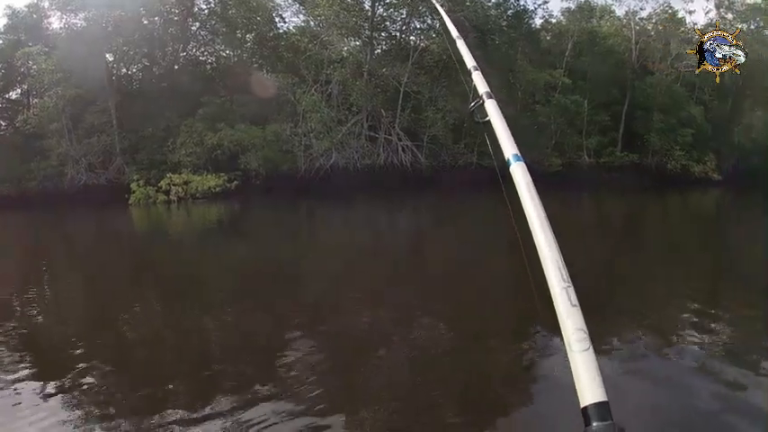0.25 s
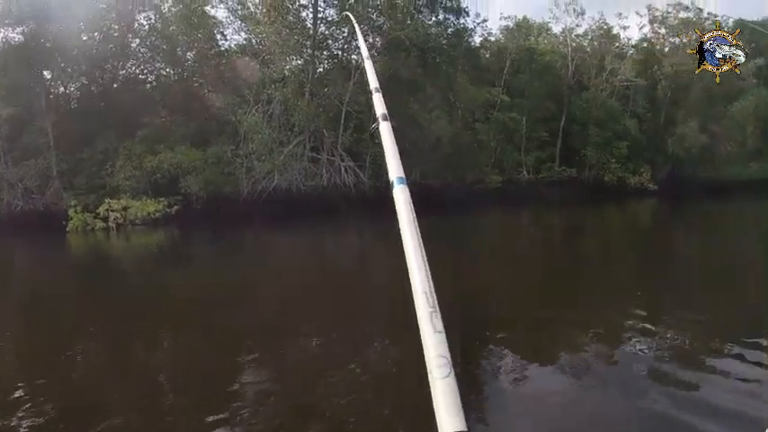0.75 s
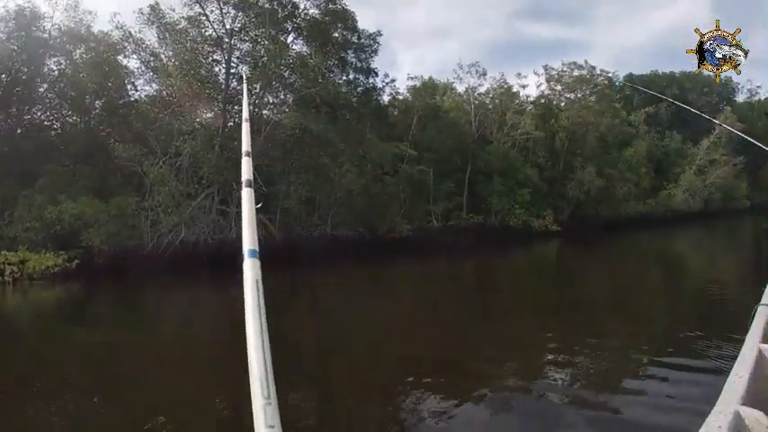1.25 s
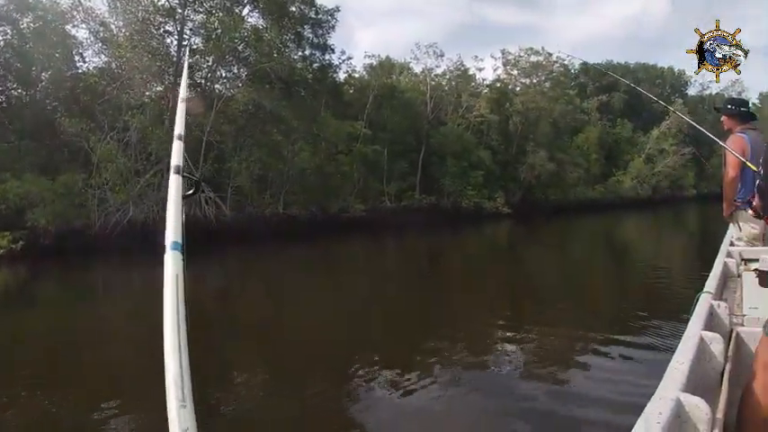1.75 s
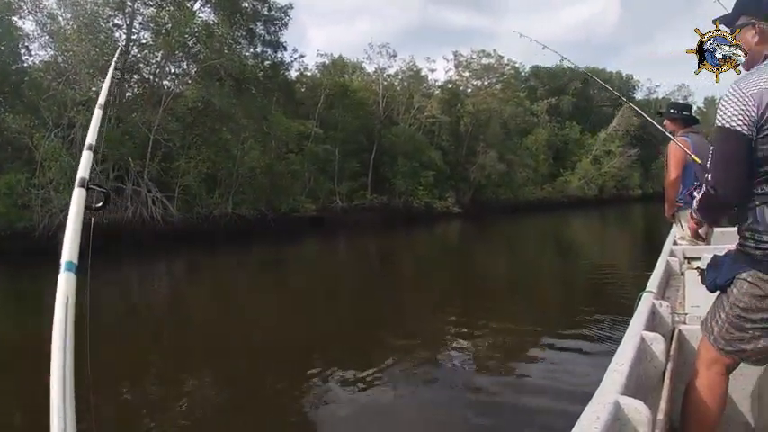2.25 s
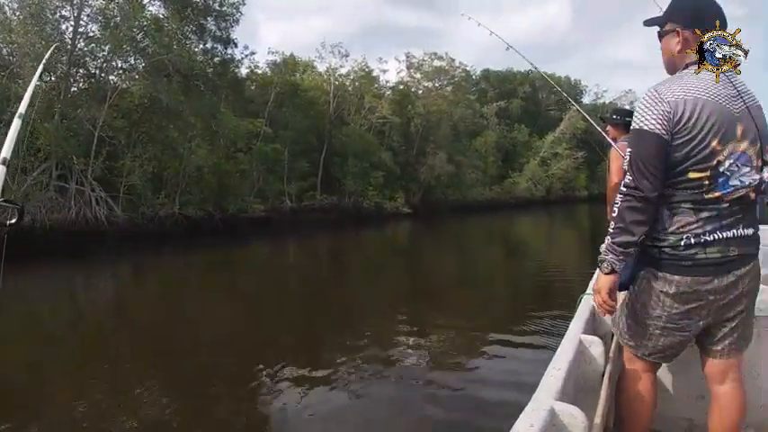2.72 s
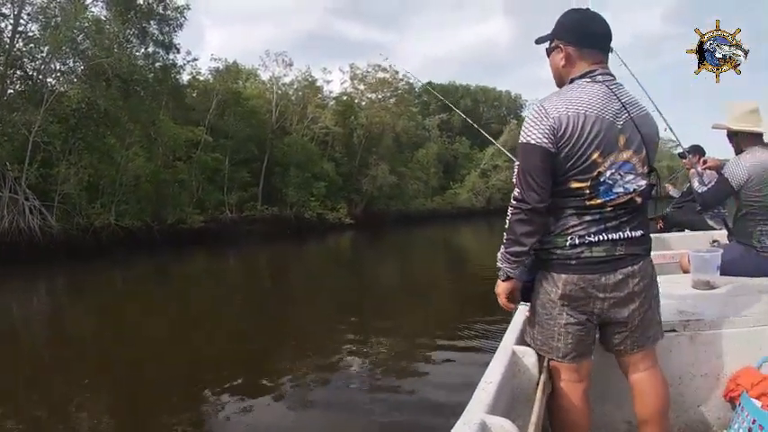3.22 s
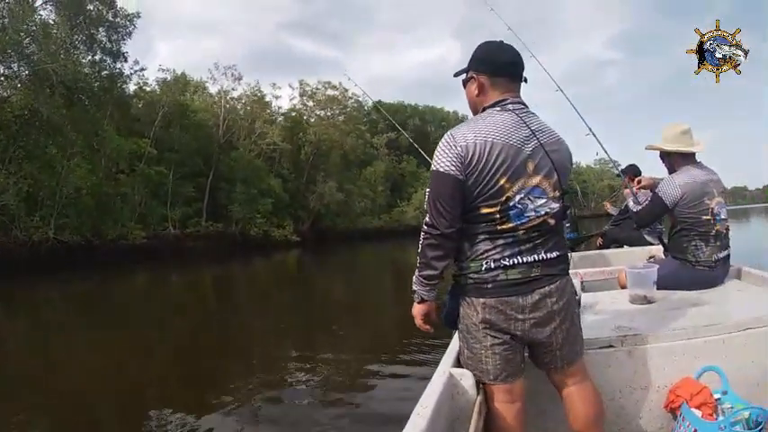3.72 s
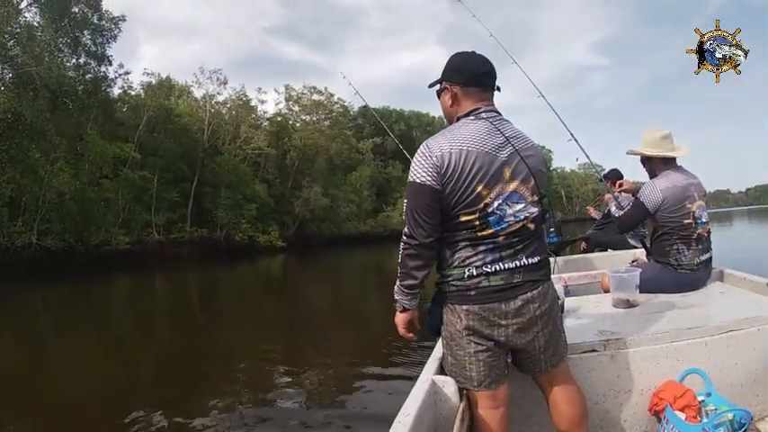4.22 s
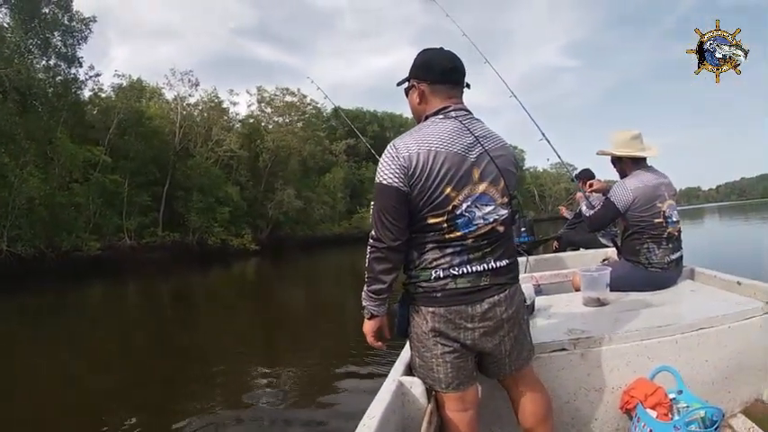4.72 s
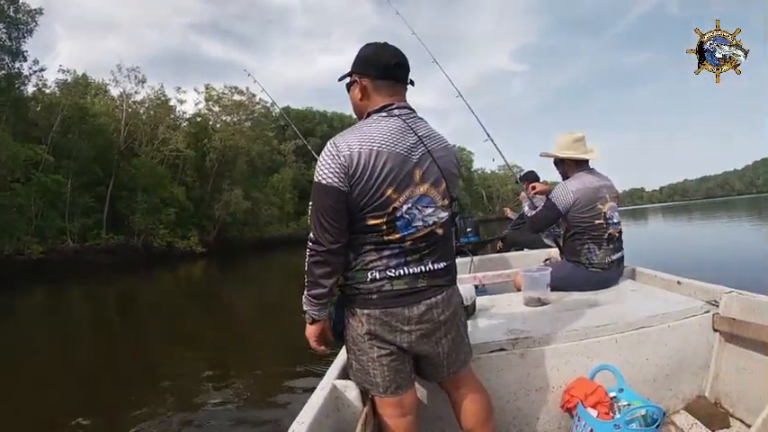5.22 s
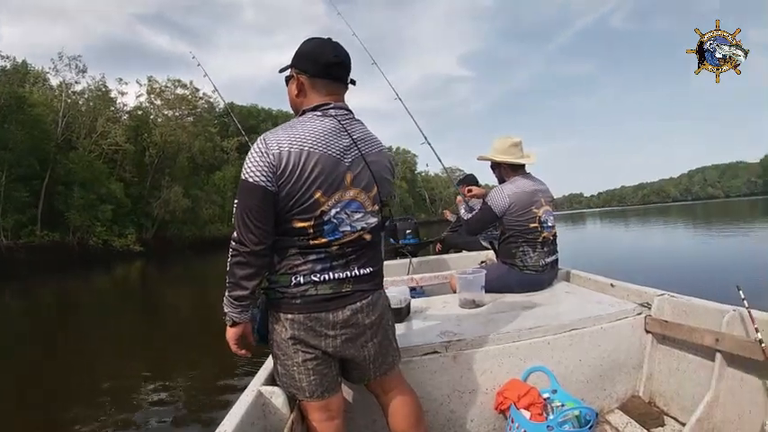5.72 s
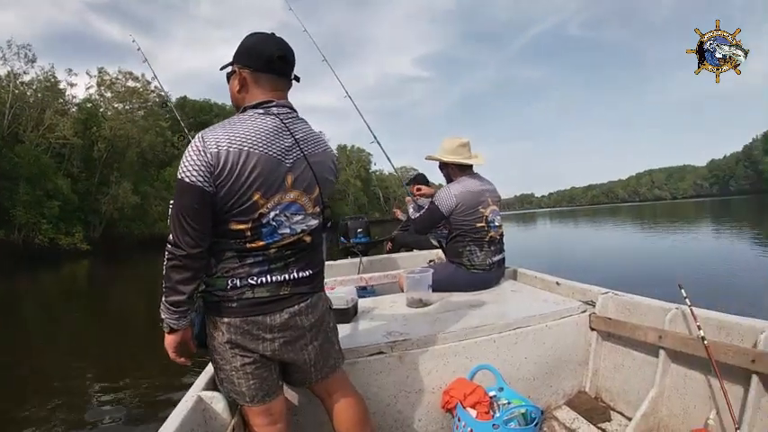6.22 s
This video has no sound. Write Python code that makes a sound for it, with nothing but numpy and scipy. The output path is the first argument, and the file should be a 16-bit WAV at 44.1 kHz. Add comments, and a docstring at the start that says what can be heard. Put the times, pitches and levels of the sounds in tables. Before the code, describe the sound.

A quiet outdoor background runs throughout: a soft breeze, a thin high hiss of insects and a faint low boom of ripples against a small boat's hull. From the start a nearby fishing reel is wound with a light rubbing sound. It clicks at about 0.5 seconds, something creaks at 0.7, and the bail snaps shut in a sharp cluster of clicks at 0.8, the loudest moment. The winding fades out by 2 seconds. From about 1.2 seconds, soles scrape, clothes rustle and gear ticks, busiest between 2.4 and 3.6. Soft, hollow foot knocks sound on the hull, strongest near 2.7, 3.5 and 3.9, with a rattling run from 5.1 to 5.5. Between 4.6 and 5.9 a distant bird whistles several high, mostly falling notes that echo in the trees. A few light knocks and rustles continue to the end, at about 6.5 seconds.

```python
"""Fishing boat on a calm creek

A reel is wound and its bail snaps shut. Feet scuff and knock on the small open hull, clothes rustle,
gear ticks and creaks. Ripples keep the hull booming. Insects hiss on the wooded bank and a far bird
whistles mostly falling notes into the echo of the trees."""
import sys
import numpy as np
from scipy import signal
from scipy.fft import rfft, irfft, next_fast_len
from scipy.io import wavfile
from scipy.ndimage import map_coordinates

SR = 44100
rng = np.random.default_rng(int(sys.argv[2]) if len(sys.argv) > 2 else 0)


def generate_wav(signal):
    """Clip the signal to [-1, 1] and save it as 16-bit WAV at the path in sys.argv[1]."""
    frames = np.transpose(np.atleast_2d(signal))
    scaled = np.clip(frames, -1, 1) * 32767
    pcm = np.round(scaled).astype(np.int16)
    wavfile.write(sys.argv[1], SR, pcm)


N = 285327


def amp(db):
    return 10 ** (np.asarray(db) / 20)


def unit_rms(x):
    return x / np.sqrt(np.mean(x ** 2) + 1e-20)


def curve(points):
    """(time_s, value) points interpolated per sample."""
    return np.interp(np.arange(N) / SR, *np.transpose(points))


def wobble(rate_hz):
    """Smooth random curve, rate_hz knots a second."""
    knots = rng.standard_normal(int(N * rate_hz / SR) + 4)
    return map_coordinates(knots, [np.arange(N) * rate_hz / SR])


def filtered(x, response):
    """x through a complex frequency response."""
    size = next_fast_len(len(x) + SR // 4)
    return irfft(rfft(x, size) * response(np.fft.rfftfreq(size, 1 / SR)), size)[:len(x)]


def coloured(x, spectrum):
    """x through (freq_hz, gain_db) points on a log axis, rms 1."""
    hz, db = np.transpose(spectrum)
    return unit_rms(filtered(x, lambda f: amp(np.interp(np.log(f + 1), np.log(hz + 1), db))))


def modes(peaks):
    """Causal response of (freq_hz, width_hz, gain_db) resonances."""
    return lambda f: sum((-1) ** k * amp(db) * 1j * f * width / (hz * hz - f * f + 1j * f * width)
                         for k, (hz, width, db) in enumerate(peaks))


def band_noise(samples, centre_hz, width_hz, stages=1):
    """Noise through identical resonators in series, rms 1."""
    band = modes([(centre_hz, width_hz, 0)])
    return unit_rms(filtered(rng.standard_normal(samples), lambda f: band(f) ** stages))


def gritty(grit_db, rate_hz):
    """Noise with a randomly jumping level, rms 1."""
    return unit_rms(rng.standard_normal(N) * amp(grit_db * wobble(rate_hz)))


def soft_top(hz):
    """Low-pass: contacts on the gear carry little of the top octave."""
    return 1 / (1 + 1.2j * hz / 8500 - (hz / 8500) ** 2) ** 3


def add(track, start_s, sound):
    part = track[round(start_s * SR):][:len(sound)]
    part += sound[:len(part)]


# Hull boom spectrum: freq_hz, gain_db
BOOM_SPECTRUM = [(8.8, -34.5), (15, -3.5), (54, -0.5), (86, -10.5), (110, -2.5), (140, -39), (240, -120)]
# Hull panel spectrum: freq_hz, gain_db
PANEL_SPECTRUM = [(80, -30), (110, -14.5), (150, 4.5), (190, -3), (230, -6), (290, -11.5), (450, -23),
                  (900, -59)]
# Panel murmur: time_s, level_db
MURMUR_LEVEL = [(0, -64), (.8, -60.5), (1.75, -65), (2.5, -56.5), (3.1, -60.5), (3.6, -62.5), (4.2, -61.5),
                (4.55, -55.5), (5, -61.5), (5.9, -66), (6.25, -60), (6.47, -61)]


def hull():
    """Ripples keep the hull booming; its panels murmur as people shift their weight."""
    boom = amp(-63.5) * coloured(gritty(grit_db=3, rate_hz=7.1), BOOM_SPECTRUM)
    murmur = amp(curve(MURMUR_LEVEL)) * coloured(gritty(grit_db=2.05, rate_hz=23), PANEL_SPECTRUM)
    return boom + murmur


# Open-air hiss spectrum: freq_hz, gain_db
AIR_SPECTRUM = [(150, -47), (250, -3.5), (365, -16.5), (482, -10.5), (808, -5.5), (1100, -15.5),
                (1480, -9.5), (1700, -12.5), (2120, -12), (3880, -14), (5390, -9.5), (5980, -12.5),
                (6750, -10.5), (10900, -36.5), (15400, -63)]
# Breeze swells: time_s, level_db
BREEZE_LEVEL = [(0, -62.5), (1.4, -69.5), (2.25, -66), (2.7, -64), (3.4, -66), (3.97, -68), (4.23, -64),
                (4.9, -65.5), (5.38, -66.5), (5.68, -68.5), (6.03, -64.5), (6.47, -70)]


def breeze():
    """The open air's hiss swells and sinks with the breeze."""
    level_db = curve(BREEZE_LEVEL) + 1.17 * wobble(rate_hz=1.835)
    return amp(level_db) * coloured(rng.standard_normal(N), AIR_SPECTRUM)


# Insect choruses: centre_hz, width_hz, level_db
INSECT_BANDS = [(5305, 930, -67), (6530, 870, -74)]
# Swell shared by the choruses: time_s, gain_db
INSECT_SWELL = [(0, -1), (1.5, 0.5), (3.5, 0), (4.2, -0.5), (5.2, -1.5), (5.8, -0.5), (6.47, 0)]


def insects():
    """Choruses hiss in narrow bands, each drifting a little in level."""
    out = np.zeros(N)
    for centre_hz, width_hz, level_db in INSECT_BANDS:
        drift_db = curve(INSECT_SWELL) + 2 * wobble(rate_hz=3.05)
        out += amp(level_db + drift_db) * band_noise(N, centre_hz, width_hz, stages=2)
    return out


# Reel body resonances: freq_hz, width_hz, gain_db
REEL_MODES = [(255, 83, -15), (495, 135, -11), (870, 150, -5.5), (1250, 86, 1.5), (1363, 276, -1.5),
              (1674, 230, -2), (2560, 150, -13.5), (3225, 156, -9), (3810, 257, -5), (5030, 550, -25),
              (6800, 800, -18)]
# Winding and handling: time_s, level_db
WINDING_LEVEL = [(0, -55), (.1, -56), (.15, -60), (.38, -56.5), (.5, -52.5), (.64, -61), (.7, -48.5),
                 (.74, -56.5), (.8, -51.5), (.89, -60.5), (.93, -52), (1.02, -61), (1.3, -64), (1.36, -76),
                 (1.62, -74), (1.68, -60.5), (1.82, -56.5), (2.06, -65.5), (2.2, -100)]
# Snaps on the reel: start_s, ring_db, upper_modes_db, crack_db, damping_factor, seat_after_s
REEL_SNAPS = [(0.448, -41, -14, -57, 1.6, .05), (0.485, -47, -3, -54, 0.46, .05),
              (0.76, -60, 15, -49, 1.5, .05), (0.7668, -32, -7, -38, 1.4, 0.0112),
              (.786, -30.5, 7.5, -32, 2.7, .05), (0.8238, -29, 8.5, -16.5, 1.4, 0.0025),
              (0.827, -41, 0, -38, 0.75, 0.0051), (0.8329, -25.5, -8, -29, 0.37, 0.0038),
              (0.8364, -21, 3.5, -15, 0.95, 0.00726), (0.837, -23.5, -13, -40, 0.7, 0.0044),
              (0.8452, -29.5, -9, -50, 0.97, 0.01), (1.643, -53.5, 11, -53, 1.3, .05),
              (1.738, -48.5, 6.5, -52, 1, .05)]


def reel():
    """Gears and line rub the reel's body; each snap cracks and rings the same modes."""
    out = amp(curve(WINDING_LEVEL)) * unit_rms(filtered(gritty(grit_db=3, rate_hz=150), modes(REEL_MODES)))
    t = np.arange(SR // 8) / SR
    attack = 1 - np.exp(-t / 0.00063)
    crack_response = modes([(4030, 2500, 1), (7800, 3400, -9)])
    for start_s, ring_db, upper_modes_db, crack_db, damping_factor, seat_after_s in REEL_SNAPS:
        ring = np.zeros(len(t))
        for hz, width_hz, gain_db in REEL_MODES:
            mode_db = ring_db + gain_db + upper_modes_db * (hz > 2000) + rng.normal(0, 1.45)
            decay = np.exp(-1.6 * width_hz * damping_factor * t)
            ring += amp(mode_db) * decay * np.sin(2 * np.pi * hz * t)
        choke = amp(-14 * np.clip((t - seat_after_s) / 0.00072, 0, 1))  # the part seats
        crack = amp(crack_db - 60 * t / 0.0066) * rng.standard_normal(len(t))
        add(out, start_s, ring * choke * attack + filtered(crack, crack_response))
    return filtered(out, soft_top)


def crinkles(rate_hz, size_db):
    """Gain that jumps at random creases and settles within milliseconds."""
    creases = (rng.random(N) < rate_hz / SR) * amp(size_db * np.minimum(rng.exponential(size=N), 2))
    return 1 + signal.lfilter([1], [1, -np.exp(-1 / (0.0021 * SR))], creases)


# Sole scrape spectrum: freq_hz, gain_db
SOLE_SPECTRUM = [(300, -47), (700, -16.5), (1100, -8.5), (1520, -3.5), (1720, -5.5), (1950, -3),
                 (2500, -7.5), (3200, -7.5), (4500, -28), (8000, -59.5)]
# Heavy cloth spectrum: freq_hz, gain_db
HEAVY_CLOTH_SPECTRUM = [(1200, -36), (2500, -4.5), (3500, -2.5), (5000, -2), (6500, -7), (9000, -27),
                        (14000, -75)]
# Thin cloth spectrum: freq_hz, gain_db
THIN_CLOTH_SPECTRUM = [(3500, -19.5), (5500, -4.5), (7800, 0), (9000, -8), (11500, -28.5), (15400, -42)]
# Scuffs and rustles: peak_s, hold_s, rise_s, fall_s, sole_db, heavy_cloth_db, thin_cloth_db
STROKES = [(.098, .002, 0.091, 0.081, -54, -57, -58.5), (0.163, 0.26, 0.039, .03, -76, -62, -70),
           (0.456, .002, .03, 0.014, -62, -53, -72), (0.486, 0.07, .01, .08, -63, -53.5, -67.5),
           (0.616, 0.032, 0.018, .02, -60, -62, -80), (0.711, .002, 0.064, .03, -47, -54, -72),
           (0.765, .002, 0.033, .03, -65, -49.5, -66), (0.919, .002, 0.17, 0.035, -61, -52, -62.5),
           (0.948, .2, .03, .05, -66, -63, -65.5), (1.207, 0.032, 0.059, 0.014, -52.5, -61, -73),
           (1.26, .002, .02, 0.058, -59, -66, -79), (1.365, .002, 0.09, 0.16, -65.5, -63.5, -67.5),
           (1.548, 0.0018, 0.14, 0.074, -58.5, -73, -68), (1.656, 0.37, 0.053, 0.066, -58, -58.5, -73),
           (2.048, .002, 0.18, .02, -89, -81, -63), (2.185, .002, 0.029, 0.15, -63.5, -60, -63.5),
           (2.346, 0.0017, 0.06, 0.071, -65, -67, -67.5), (2.428, 0.14, 0.051, 0.07, -49, -48, -59.5),
           (2.468, .002, 0.0069, .012, -61, -44.5, -67), (2.555, .002, 0.11, 0.053, -58, -51, -52),
           (2.651, .002, 0.027, 0.044, -61, -63, -59), (2.889, 0.052, 0.043, 0.093, -42.5, -64, -60.5),
           (2.8, 0.063, 0.054, 0.027, -56, -63, -66), (2.91, 0.063, 0.15, 0.024, -51.5, -52, -68),
           (2.993, 0.0018, 0.018, 0.025, -46, -45.5, -61), (3.052, .002, 0.041, .04, -75, -64, -68),
           (3.162, .002, 0.017, 0.047, -52.5, -55, -58.5), (3.225, .002, 0.013, 0.037, -50, -56, -64),
           (3.262, 0.083, .02, 0.13, -61, -63, -72.5), (3.46, 0.0089, 0.013, 0.013, -47.5, -51.5, -56),
           (3.579, .002, 0.083, 0.045, -54.5, -52.5, -54), (3.632, 0.067, 0.038, 0.081, -73, -64, -56),
           (3.819, .002, 0.068, 0.22, -51, -56, -66), (4.017, 0.034, 0.034, .03, -54.5, -55, -61.5),
           (4.156, .002, 0.055, 0.06, -58.5, -72, -66.5), (4.308, 0.13, 0.027, .05, -58, -56.5, -63.5),
           (4.441, 0.043, 0.044, .02, -45, -49, -62.5), (4.495, .09, .02, 0.22, -67, -57.5, -71),
           (4.59, .002, 0.081, 0.056, -74, -75, -54.5), (4.73, 0.089, .03, .03, -64.5, -74, -78),
           (5.167, .002, 0.043, 0.051, -47, -66, -75), (5.243, 0.078, .02, 0.032, -61.5, -68, -73),
           (5.434, .002, .01, 0.074, -53, -51, -67), (5.522, 0.0022, 0.021, 0.069, -54, -64, -85),
           (5.798, .002, .06, .15, -65, -70, -82), (5.913, .002, 0.0072, 0.022, -66, -44.5, -65),
           (6.109, .002, .05, .04, -65, -64, -81), (6.278, .002, .06, 0.13, -74, -63.5, -83)]


def scuffs_and_rustles():
    """Soles scrape in grit, cloth whispers and crinkles; each stroke swells, holds and fades."""
    gains, t = np.zeros((3, N)), np.arange(N) / SR
    for peak_s, hold_s, rise_s, fall_s, *levels_db in STROKES:
        first = max(round((peak_s - 3 * rise_s) * SR), 0)
        span = slice(first, round((peak_s + hold_s + 3 * fall_s) * SR))
        since_peak_s = t[span] - peak_s
        drop_db = 20 * np.maximum(-since_peak_s / rise_s, np.maximum(since_peak_s - hold_s, 0) / fall_s)
        gains[:, span] += amp(np.array(levels_db)[:, None] - drop_db)
    sole_gain, heavy_gain, thin_gain = gains
    # Both cloths catch and slip together.
    catch = amp(1.95 * wobble(rate_hz=120)) * crinkles(rate_hz=40, size_db=4)
    grit = crinkles(rate_hz=60, size_db=-5) * gritty(grit_db=2.5, rate_hz=280)
    sole = sole_gain * coloured(grit, SOLE_SPECTRUM)
    heavy = heavy_gain * coloured(catch * rng.standard_normal(N), HEAVY_CLOTH_SPECTRUM)
    thin = thin_gain * coloured(catch * rng.standard_normal(N), THIN_CLOTH_SPECTRUM)
    return amp(-4) * sole + amp(-3) * heavy + amp(1.5) * thin


# Foot knocks on the hull: start_s, deck_db, deck_hz, keel_db, locker_db, box_db, rattle_db
KNOCKS = [(.334, -52, 158.6, -78, -62, -69, -54), (.838, -46.5, 264, -70, -47, -50, -53),
          (1.208, -52.5, 227, -61, -80, -72, -62), (1.546, -43, 106, -59, -54.5, -62, -64),
          (1.569, -46, 110, -64, -76, -69, -56), (1.599, -50.5, 201, -71, -74, -76, -63),
          (1.987, -51, 282, -71, -35.5, -65, -60), (2.029, -50.5, 169, -65, -68, -61, -59),
          (2.139, -51.5, 213, -62, -57, -63, -54.5), (2.187, -46.5, 204, -56, -57, -61, -52),
          (2.693, -40, 224, -43, -66, -69, -55), (2.719, -52, 102, -49, -62, -70, -70),
          (2.744, -43, 215.5, -65, -54, -58, -55), (2.98, -51, 189, -68, -58, -45, -55),
          (2.998, -49, 180.5, -60, -62, -69, -46.5), (3.497, -32.5, 250.5, -51.5, -48, -40, -35.5),
          (3.539, -45.5, 261, -52, -56, -65, -64), (3.857, -33.5, 194.7, -48, -46.5, -81, -49.5),
          (3.899, -42, 183, -59, -83, -60, -66), (4.259, -50, 193, -75, -78, -78, -67),
          (4.499, -65, 177, -73, -65, -59, -53), (4.52, -55, 238, -69, -58, -64, -58),
          (4.538, -52, 221, -71, -49, -57, -51), (4.578, -55, 262, -75, -53.5, -62, -52),
          (4.601, -56, 226, -72, -58, -58, -57), (4.652, -64, 160, -73, -53, -57, -52),
          (4.689, -51.5, 260, -64, -56, -66, -68), (4.779, -58, 167, -53.5, -64, -52.5, -65),
          (4.852, -45.5, 195, -65, -72, -68, -64), (4.968, -47.5, 152, -50, -88, -65, -67),
          (5.121, -46.5, 300, -59, -45, -50, -53.5), (5.164, -50, 239, -65, -44, -40.5, -50),
          (5.194, -51, 179, -72, -41.5, -40, -52), (5.2165, -49.5, 232, -70, -59, -31, -47),
          (5.236, -55.5, 294, -65, -68, -38.5, -44.5), (5.428, -36, 297, -70, -38, -40, -44.5),
          (5.445, -37, 223.5, -76, -39.5, -69, -68), (5.464, -53, 298, -71, -39.5, -45.5, -50),
          (5.489, -44.5, 265, -66, -44.5, -61, -51), (5.529, -44, 252.6, -63, -63, -55, -58),
          (5.569, -56.5, 230, -55, -64, -77, -77), (5.724, -61, 127, -55.5, -62, -65, -52),
          (5.907, -49, 217, -61, -58, -53, -50.5), (5.939, -55, 210, -55.5, -54.5, -58, -70),
          (6.074, -49, 215, -72, -53, -50, -52), (6.104, -49, 210, -72, -51.5, -61, -52.5),
          (6.149, -66.5, 207, -61, -72, -52, -72), (6.224, -43.5, 271, -63, -48, -40, -51.5),
          (6.264, -54, 254, -68, -53.5, -53, -62), (6.299, -56, 270, -59, -63, -67, -64)]


def knocks():
    """A soft blow rings the deck panel, keel, locker and tackle box; loose gear rattles after it."""
    keel_hz, locker_hz, box_hz = 61.7, 375.2, 647.6
    deck_t60_s, rattle_t60_s = 0.63 * 0.14, 0.74 * 0.14
    out, t = np.zeros(N), np.arange(SR // 5) / SR
    end_fade = np.clip(5 - 5 * t / t[-1], 0, 1)
    for start_s, deck_db, deck_hz, keel_db, locker_db, box_db, rattle_db in KNOCKS:
        parts = [(deck_hz, deck_db, 1), (keel_hz, keel_db, 1.64),
                 (locker_hz, locker_db, 0.76), (box_hz, box_db, 0.58)]
        for pitch_hz, level_db, t60_ratio in parts:
            neighbours_hz = pitch_hz * (1 + 0.1074 * rng.standard_normal((3, 1)))
            neighbours = np.sin(2 * np.pi * neighbours_hz * t).sum(axis=0)
            ring = np.sin(2 * np.pi * pitch_hz * t) + 0.45 * neighbours  # close modes beat
            attack = 1 - np.exp(-(t / (0.5 / pitch_hz + 0.0045)) ** 2)
            decay = amp(level_db - 60 * (t / (t60_ratio * deck_t60_s)) ** 1.75)
            add(out, start_s, ring * attack * decay * end_fade)
        rattle = band_noise(len(t), centre_hz=1110, width_hz=1230) * amp(rattle_db - 60 * t / rattle_t60_s)
        add(out, start_s, rattle * (1 - np.exp(-t / 0.0017)))
    # Soft soles send little treble.
    return filtered(out, lambda hz: 1j * hz / (45 + 1j * hz) / (1 + 1j * hz / 2500) ** 3)


# After-ring spectrum of the open hull: freq_hz, gain_db
HULL_RING_SPECTRUM = [(150, -12), (230, 2.5), (400, -1), (700, -4.5), (1200, -22)]


def hull_ring(blows, t60_s=0.17, tail_db=-1):
    """The hull's many loose modes add a rough low tail, a little different from spot to spot."""
    tails, block, t = np.zeros(N), SR // 4, np.arange(SR // 3) / SR
    envelope = amp(-60 * t / t60_s) * (1 - np.exp(-t / 0.0042))
    for first in range(0, N, block):
        impulse = envelope * coloured(rng.standard_normal(len(t)), HULL_RING_SPECTRUM)
        impulse /= np.abs(rfft(impulse)).max()
        add(tails, first / SR, signal.fftconvolve(blows[first:first + block], impulse))
    return blows + amp(tail_db) * tails


# Creaks, faint squeaks and thin insect whines: start_s, end_s, pitch_hz, width_hz, start_db, end_db
CREAKS = [(0.652, 0.675, 1260, 80, -58, -50), (0.674, 0.722, 1258, 81, -44.5, -41.5),
          (4.146, 4.19, 1206, 90, -55, -67), (5.164, 5.18, 1720, 121, -49, -47),
          (5.721, 5.748, 1410, 100, -54, -60), (0.874, 0.93, 1250, 90, -59, -54),
          (0.953, 1.021, 1497, 90, -65, -60.5), (1.238, 1.332, 1420, 152, -60, -68),
          (2.05, 2.085, 3130, 100, -76, -71), (3.04, 3.462, 3230, 120, -69, -73),
          (4.107, 4.172, 3450, 120, -72, -72), (4.235, 4.284, 3340, 100, -68, -72),
          (4.653, 4.696, 4000, 90, -64, -66), (5.383, 5.42, 1396, 79, -66, -64),
          (5.723, 5.907, 1330, 80, -61, -76), (5.725, 5.882, 2180, 250, -68, -74),
          (5.76, 5.916, 647, 60, -71, -84), (5.99, 6.06, 6410, 119, -64, -71),
          (4.956, 5.106, 715, 79.4, -71, -79.5)]


def creaks(fade_s=0.0038):
    """Rough tones, each held on one pitch, with soft ends."""
    out, lead_in = np.zeros(N), SR // 10
    for start_s, end_s, pitch_hz, width_hz, start_db, end_db in CREAKS:
        t = np.arange(0, end_s - start_s, 1 / SR)
        rough = band_noise(lead_in + len(t), pitch_hz, width_hz, stages=2)[lead_in:]
        tone = rough + 0.39 * np.sin(2 * np.pi * pitch_hz * t)
        fade = np.clip(np.minimum(t, t[-1] - t) / fade_s, 0, 1)
        add(out, start_s, tone * fade * amp(np.linspace(start_db, end_db, len(t))))
    return out


# Small ticks of gear: start_s, level_db, pitch_hz
GEAR_TICKS = [(.677, -40, 1250), (1.1945, -39, 2990), (1.229, -37, 3580), (1.5382, -41.5, 1616),
              (1.5968, -42.5, 1430), (2.0353, -50, 1240), (2.1886, -45, 4140), (2.432, -34.5, 1500),
              (2.4658, -33.5, 3710), (2.5274, -30, 1626), (2.6469, -45, 1560), (2.7427, -50, 1125),
              (2.7793, -39.5, 1970), (2.886, -31.5, 2020), (2.9088, -25.5, 1920), (2.989, -38, 1980),
              (3.0435, -47, 3280), (3.1643, -35.5, 2440), (3.2237, -52, 2100), (3.457, -31, 1930),
              (3.4694, -43, 2060), (3.489, -29, 1700), (3.5824, -38, 6950), (3.6616, -41, 6070),
              (4.1538, -44, 1230), (4.4363, -47, 2750), (4.54, -48, 2170), (4.7292, -54, 4550),
              (4.7976, -46, 4770), (5.163, -41, 1740), (5.22, -39, 4200), (5.4324, -40.5, 1700),
              (5.476, -41, 2820), (5.5297, -49, 2950), (5.726, -50, 1440), (5.8008, -47, 1310),
              (5.9109, -43, 1770)]


def gear_ticks(ring_t60_s=0.056):
    """Each contact gives a rough ring at its own pitch and a short wide crack."""
    out, t = np.zeros(N), np.arange(SR // 8) / SR
    attack = 1 - np.exp(-t / 0.0013)
    crack_t60_s = 0.51 * ring_t60_s
    for start_s, level_db, pitch_hz in GEAR_TICKS:
        ring = band_noise(len(t), pitch_hz, 0.35 * pitch_hz) + 0.88 * np.sin(2 * np.pi * pitch_hz * t)
        crack = band_noise(len(t), centre_hz=3370, width_hz=7600)
        tick = ring * amp(-60 * t / ring_t60_s) + crack * amp(-10.5 - 60 * t / crack_t60_s)
        add(out, start_s, amp(level_db - 9) * attack * tick)
    return filtered(out, soft_top)


# Bird glides, one list of points per note: time_s, pitch_hz, level_db
BIRD_NOTES = [
    [(4.645, 7440, -71), (4.68, 6200, -60.5), (4.72, 4915, -56), (4.775, 3555, -61), (4.79, 3550, -89)],
    [(4.893, 5450, -66), (4.91, 5120, -54), (4.94, 4040, -60), (4.97, 3130, -67)],
    [(5.045, 5470, -58), (5.06, 5320, -56), (5.085, 4720, -55.5), (5.10, 4250, -55)],
    [(5.078, 3964, -60), (5.095, 3800, -57), (5.12, 3300, -64.5), (5.14, 3120, -57)],
    [(5.26, 2920, -55.5), (5.28, 3050, -64.5), (5.295, 3505, -58), (5.31, 3880, -61), (5.35, 3780, -68),
     (5.41, 3700, -74)],
    [(5.62, 5400, -82), (5.645, 4790, -65), (5.68, 4330, -68), (5.705, 4030, -78.5)],
    [(5.50, 3340, -68.5), (5.55, 2846, -67.5), (5.60, 2340, -76), (5.62, 2200, -71)],
    [(5.755, 3150, -68), (5.795, 3350, -73), (5.83, 3860, -70), (5.86, 3760, -81)],
]


def bird(echo_t60_s=1.2, echo_db=8):
    """Whistled glides from far off; the echo among the trunks is stronger than the direct sound."""
    song = np.zeros(N)
    for note in BIRD_NOTES:
        time_s, pitch_hz, level_db = np.transpose(note)
        t = np.arange(time_s[0], time_s[-1], 1 / SR)
        fade = np.clip(np.minimum(t - time_s[0], time_s[-1] - t) / 0.0035, 0, 1)
        phase = 2 * np.pi * np.cumsum(np.interp(t, time_s, pitch_hz)) / SR
        add(song, time_s[0], fade * amp(np.interp(t, time_s, level_db)) * np.sin(phase))
    song *= 1 + 0.47 * wobble(rate_hz=400)  # husky throat
    t = np.arange(SR) / SR
    impulse = rng.standard_normal(SR) * amp(-60 * t / echo_t60_s)
    echo = signal.fftconvolve(song, impulse / np.linalg.norm(impulse))[:N]
    return 0.88 * song + amp(echo_db) * echo


def scene():
    """Boat and bank, mono."""
    boat = reel() + creaks() + scuffs_and_rustles() + gear_ticks() + hull_ring(knocks()) + hull()
    return (boat + breeze() + insects() + bird())[None]


def record(dry):
    """Brick-wall low-pass."""
    cutoff_hz = 15600
    return filtered(dry[0], lambda hz: hz < cutoff_hz)[None]


dry = scene()
out = record(dry)
generate_wav(out)
```